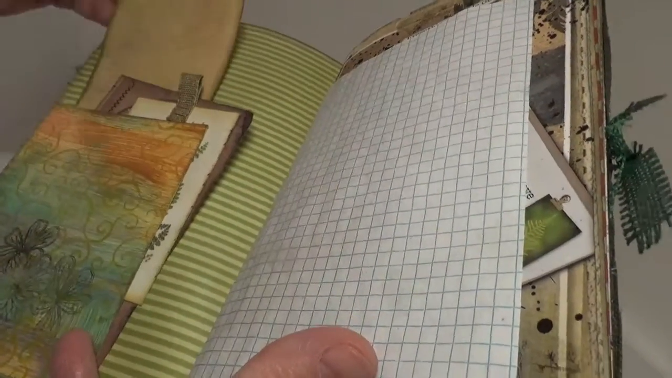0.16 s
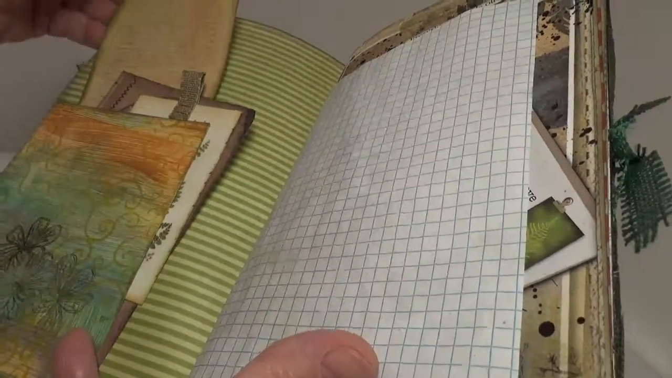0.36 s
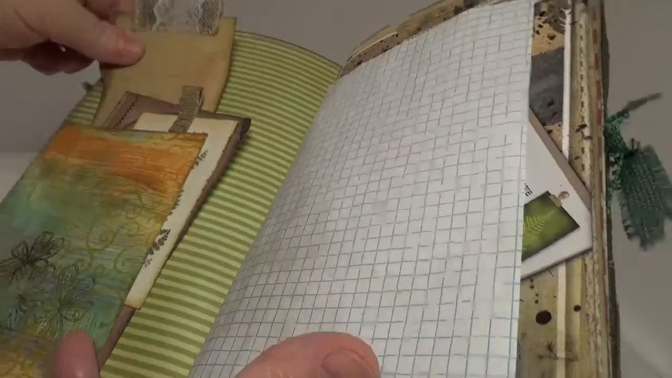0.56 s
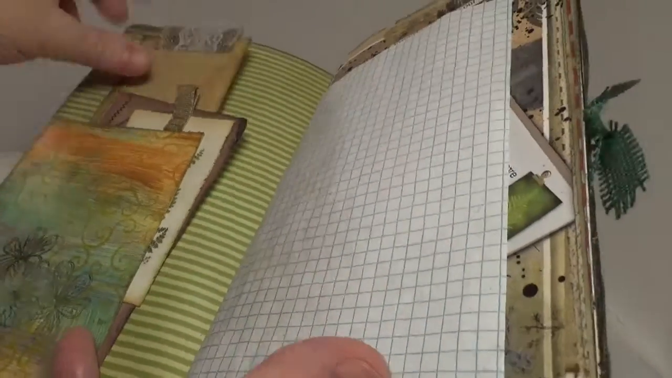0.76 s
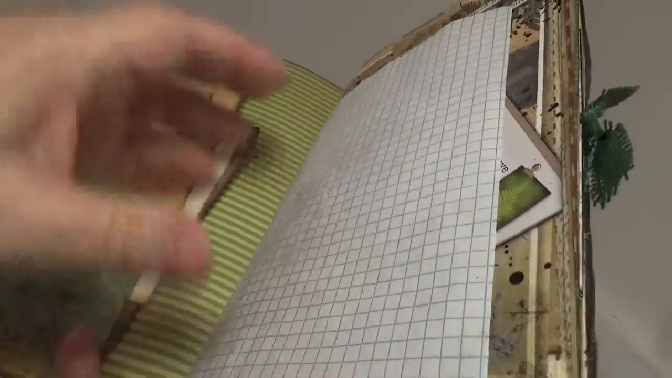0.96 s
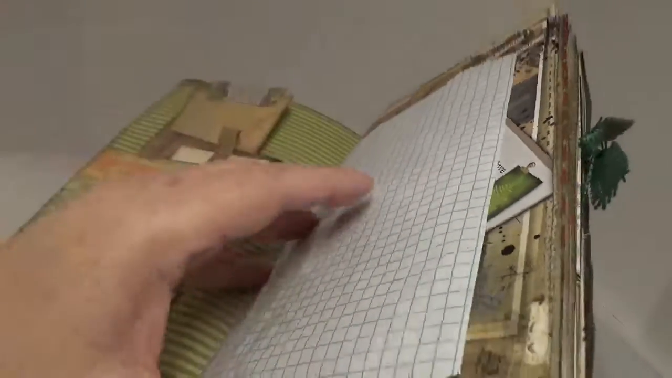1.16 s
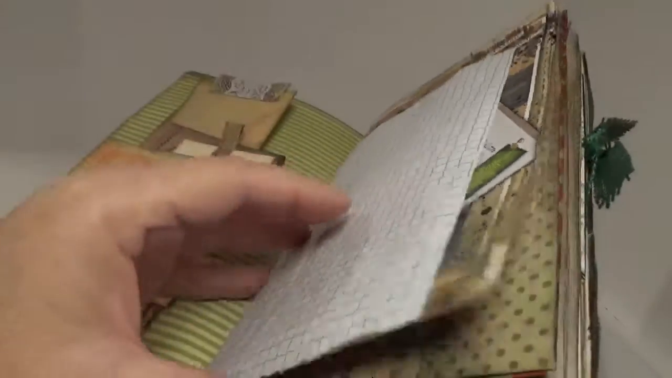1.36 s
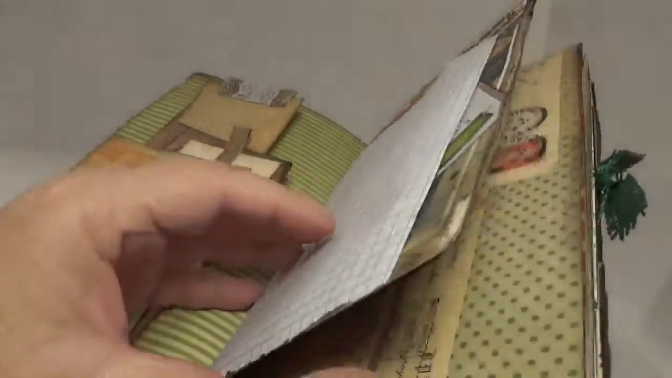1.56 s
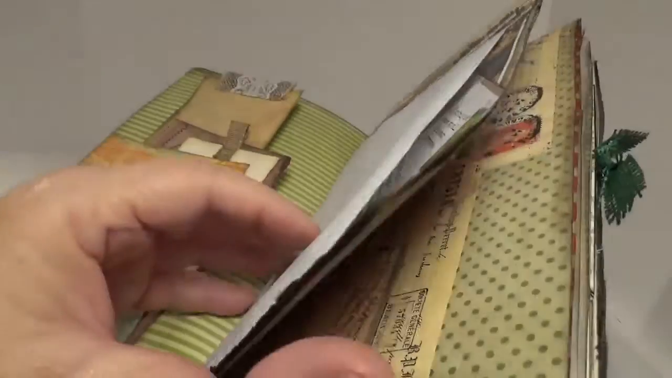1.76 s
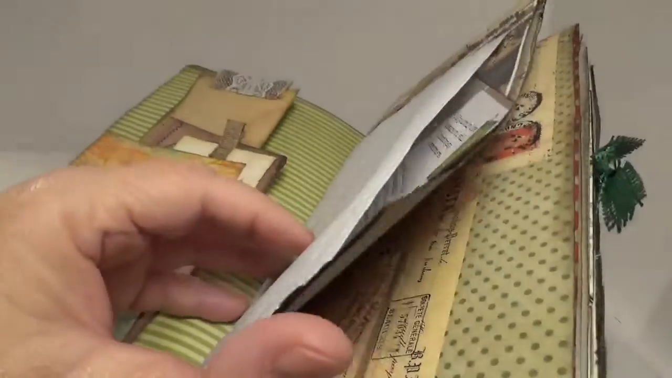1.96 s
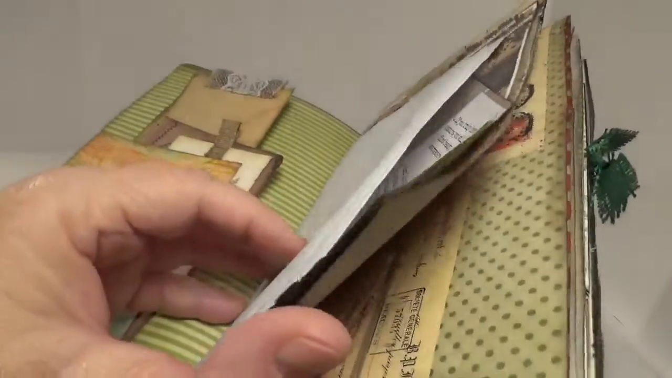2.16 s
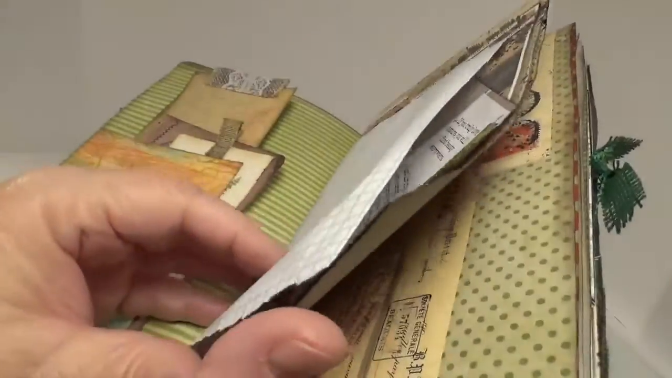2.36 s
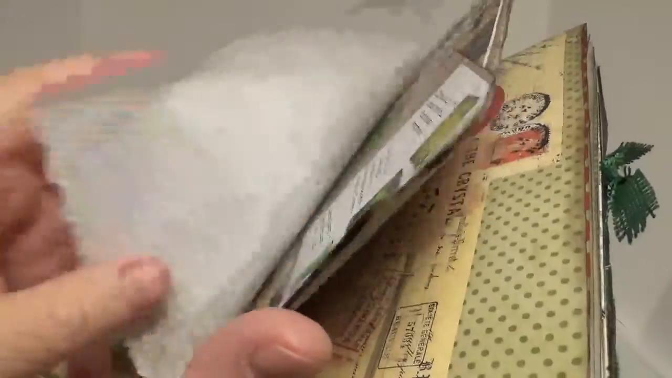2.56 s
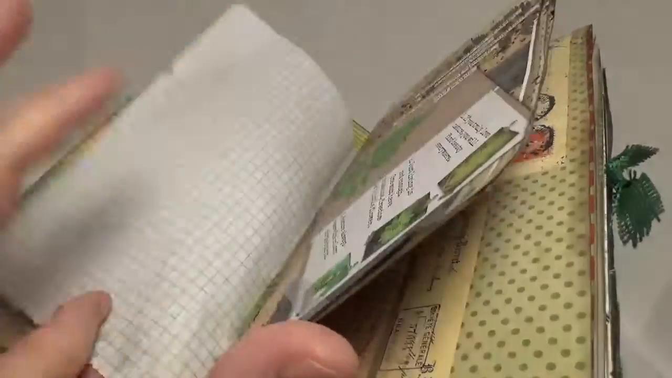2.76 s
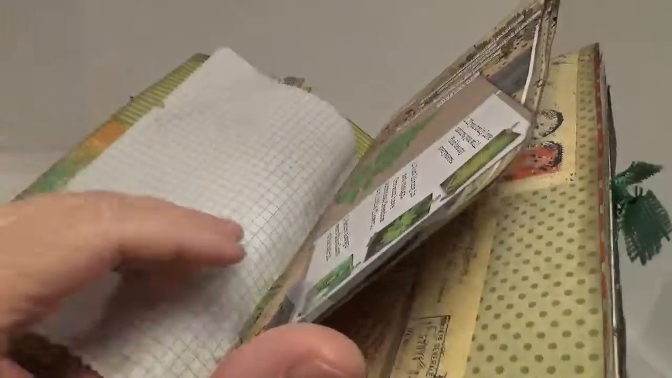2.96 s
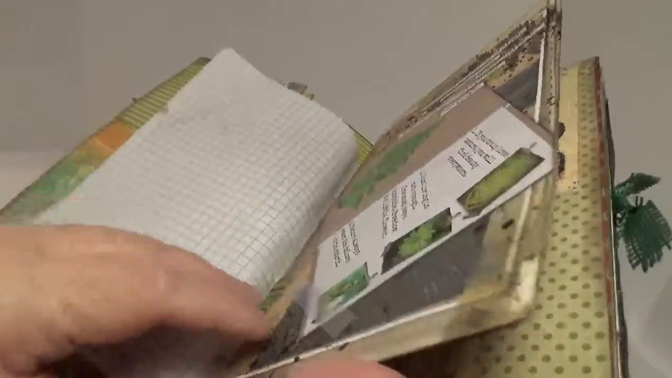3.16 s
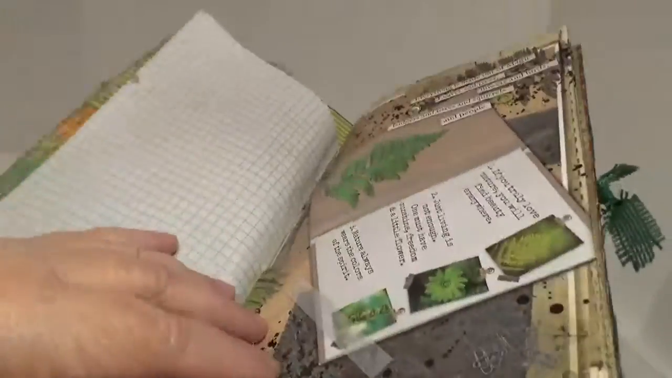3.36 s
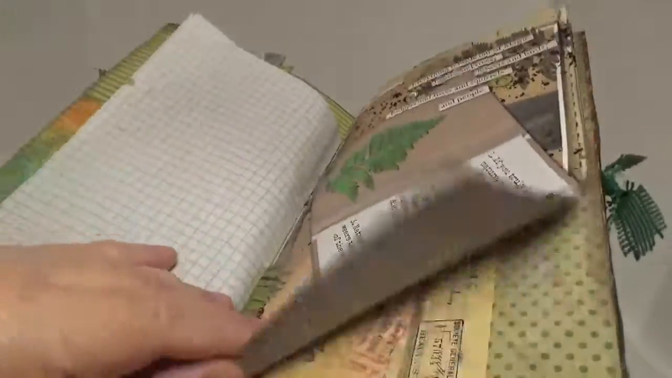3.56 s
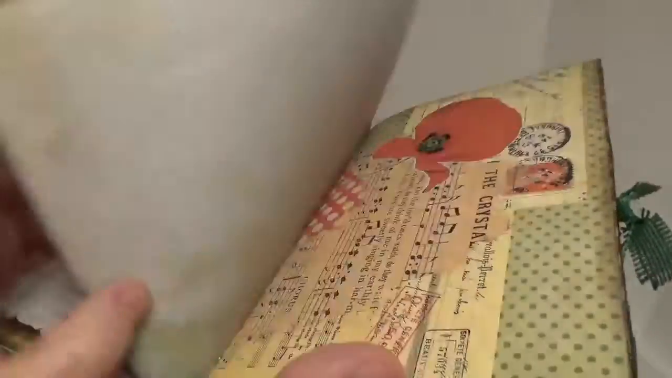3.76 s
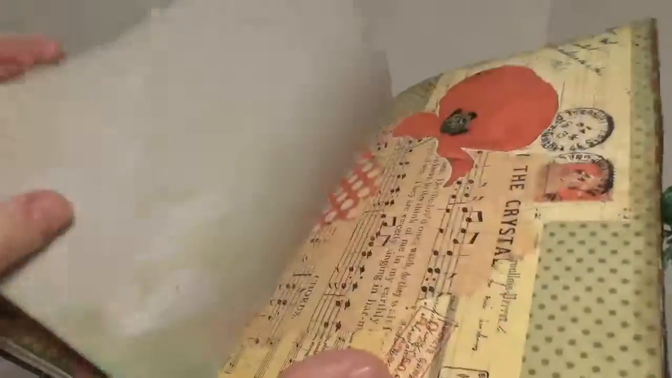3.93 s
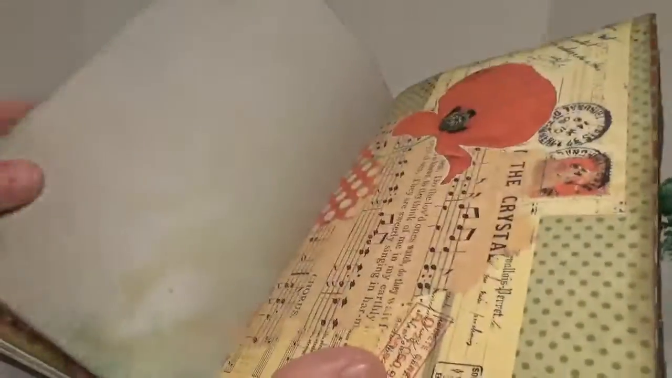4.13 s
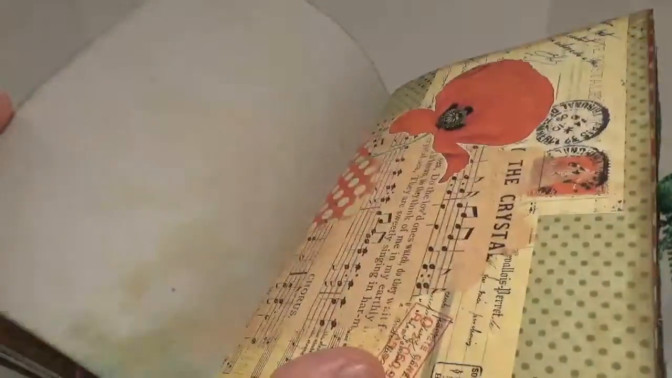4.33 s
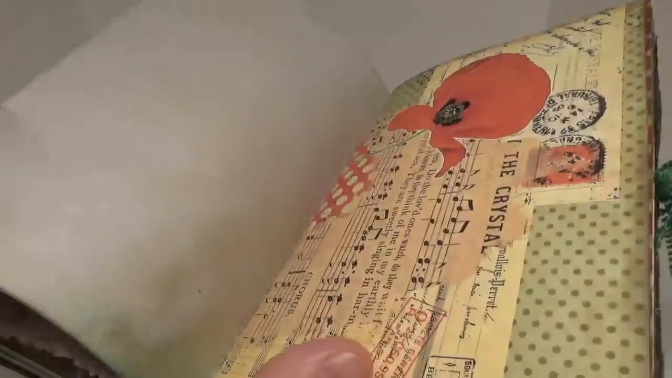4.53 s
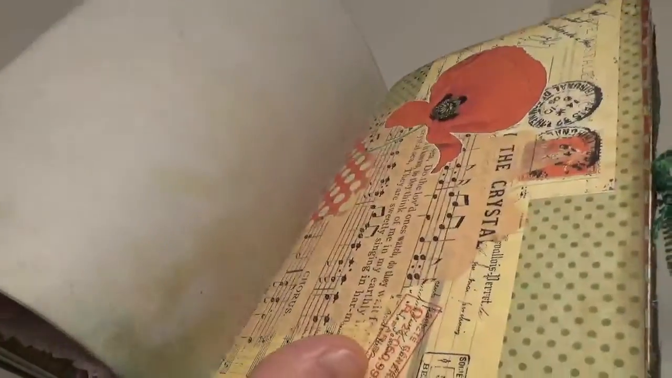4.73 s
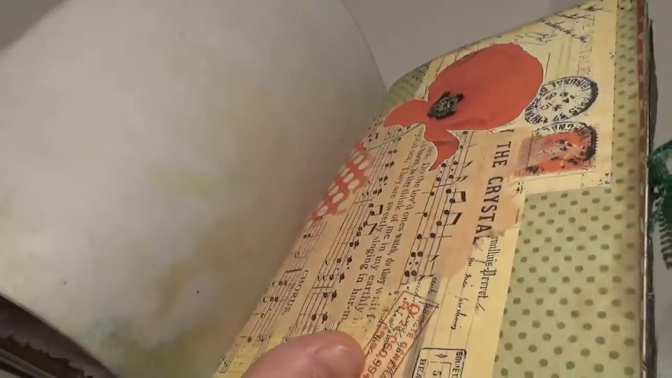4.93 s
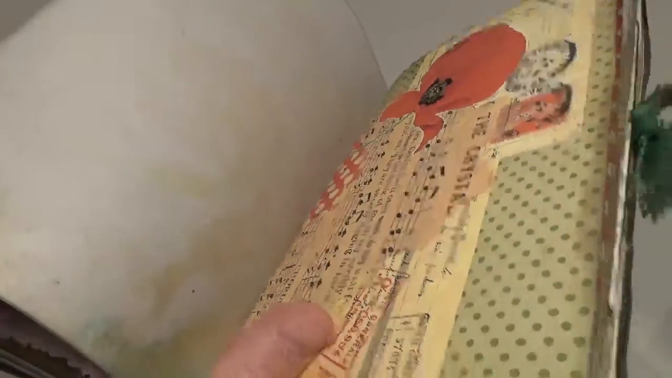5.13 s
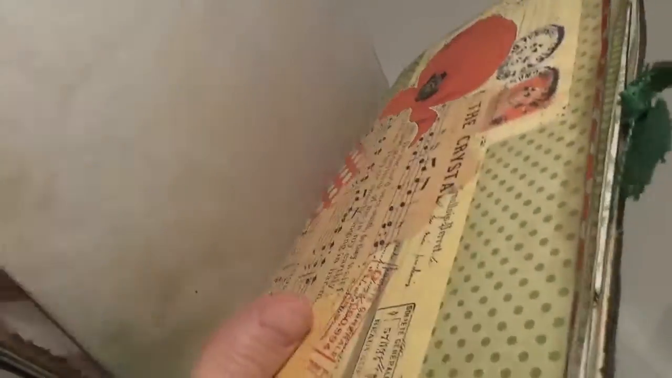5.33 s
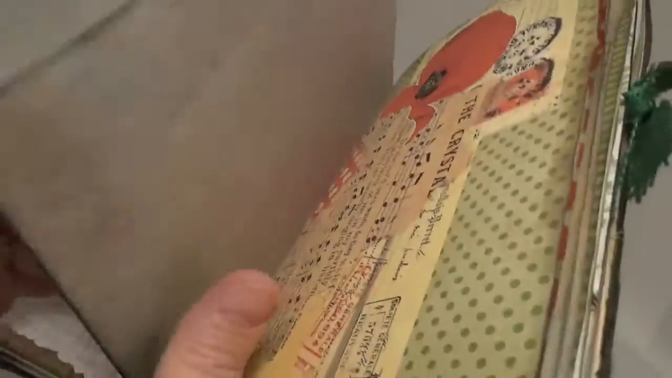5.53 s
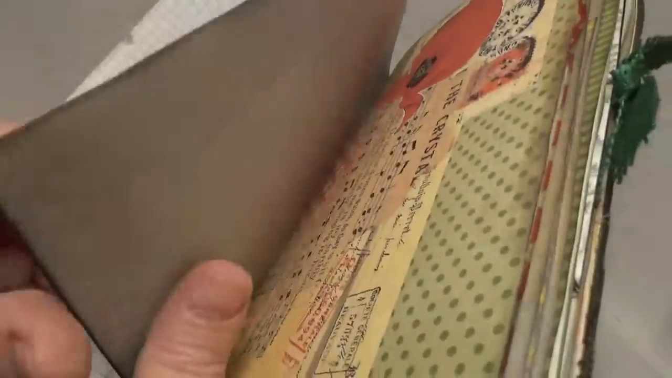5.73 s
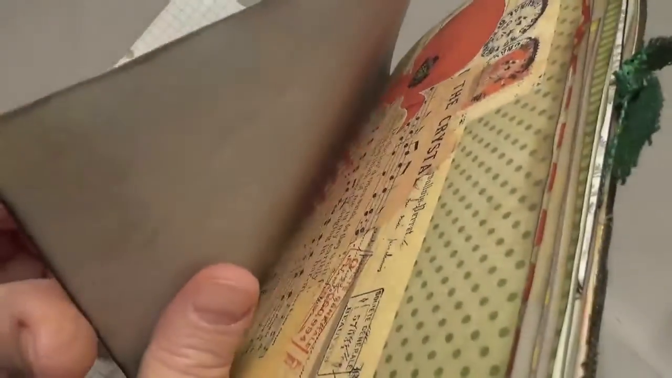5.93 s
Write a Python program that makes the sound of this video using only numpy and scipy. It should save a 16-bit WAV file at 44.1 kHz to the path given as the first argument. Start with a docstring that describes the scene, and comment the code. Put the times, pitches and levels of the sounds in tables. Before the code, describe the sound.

Close to the microphone, hands handle a thick album of paper and card. Light, dry sliding comes first, then a near lull, then a dense burst of sharp crackles and rustles as a sheet is flipped. More snapping strokes follow, with soft low puffs of air from swinging pages. After a quieter pause comes another brief crinkly turn, then faint brushing. The small, quiet room has a faint low hum.

```python
"""Sheets slide over one another as hands leaf through a thick album of paper pages and cards, close by.
Each stroke is friction noise in three bands, roughened by tiny catches and ringing crinkles. Creases
snap through as short coloured noise bursts; turned pages flap air as low, quickly dying sine puffs.
Behind them lie a short diffuse room, shaped air noise and the narrow noise bands of a far machine."""
import sys
import numpy as np
from scipy import signal
from scipy.fft import rfft, irfft, next_fast_len
from scipy.io import wavfile
from scipy.ndimage import uniform_filter1d, map_coordinates

SR = 44100
rng = np.random.default_rng(int(sys.argv[2]) if len(sys.argv) > 2 else 0)


def master(y):
    """Save y as 16-bit WAV."""
    cut = np.clip(np.atleast_2d(y).T, -1, 1)
    pcm = np.round(cut * 32767)  # scale
    wavfile.write(sys.argv[1], SR, pcm.astype(np.int16))


N = 268789


def amp(db):
    """Decibels to gain."""
    return 10 ** (np.asarray(db) / 20)


def unit(x):
    """Scaled to rms 1."""
    return x / np.sqrt(np.mean(x ** 2) + 1e-20)


def along(points, hz):
    """Value at hz between (Hz, value) points on a log frequency axis."""
    f, v = np.transpose(points)
    return np.interp(np.log(hz + 1), np.log(f + 1), v)


def wobble(rate):
    """A smooth random curve with rate knots a second."""
    knots = rng.standard_normal(int(N * rate / SR) + 4)
    return map_coordinates(knots, [np.arange(N) * rate / SR])


def filtered(x, response):
    """x shaped by a response that is a function of frequency in Hz."""
    m = next_fast_len(x.shape[-1] + 8192)
    spectrum = rfft(x, m) * response(np.fft.rfftfreq(m, 1 / SR))
    return irfft(spectrum, m)[..., :x.shape[-1]]


def resonance(f, hz, width_hz):
    """Response of one causal resonance, with gain 1 at its centre."""
    return 1j * f * width_hz / (hz * hz - f * f + 1j * f * width_hz)


def room_tone():
    """Air noise, most alike at both microphones in the bass, and a wavering hum of narrow noise bands."""
    # Colour of the air. Each row: frequency in Hz, relative level in dB.
    air_colour = [(25, -22), (55, -16.5), (125, -13.5), (270, -24), (1200, -30), (5000, -34.5),
                  (11000, -42.5)]
    # Bands of the far machine. Each row: centre in Hz, width of each of two passes in Hz, rms level in dB.
    hum_bands = [(61.5, 0.27, -56), (70.8, 23, -56), (112.3, 17, -58.5), (176.8, 8.7, -60.5),
                 (239.3, 8, -61.5)]
    air_db = -52.5
    likeness = [(200, 0.97), (600, 0.23), (3000, 0.35), (6000, 0.75)]  # (Hz, correlation left to right)

    def mid_and_side(hz):
        turn = np.arccos(np.clip(along(likeness, hz), 0, 1)) / 2
        return amp(along(air_colour, hz)) * [np.cos(turn), np.sin(turn)]

    mid, side = filtered(rng.standard_normal((2, N)), mid_and_side)
    air = amp(air_db) * unit(np.array([mid + side, mid - side]))
    hum = np.zeros(N)
    for hz, width_hz, db in hum_bands:
        band = filtered(rng.standard_normal(N), lambda f: resonance(f, hz, width_hz) ** 2)
        hum += amp(db) * unit(band)
    return air + hum


def room(x):
    """Diffuse answer of the room: decaying noise, different at each microphone."""
    # How long the room rings. Each row: frequency in Hz, time to die by 60 dB in seconds.
    decay_times = [(300, 0.013), (2000, 0.067), (10000, 0.0028)]
    hz, t, z = signal.stft(rng.standard_normal((2, SR // 3)), SR, nperseg=256)
    decay = amp(-60 * t / along(decay_times, hz)[:, None])
    tail = signal.istft(z * decay, SR, nperseg=256)[1]
    tail = tail / np.linalg.norm(tail, axis=1, keepdims=True)
    return signal.fftconvolve(x[None], tail, axes=1)[:, :N]


def flaps():
    """A page swings and pushes a soft low puff of air: one lump that rings briefly."""
    # Pages pushing air. Each row: start in seconds, peak of the envelope in dB, centre in Hz.
    puffs = [(1.369, -40, 345), (2.615, -25.5, 193), (4.045, -28.5, 140), (4.147, -30.5, 288),
             (5.314, -23.5, 181)]
    out, t = np.zeros(N + SR), np.arange(8192) / SR
    for start_s, db, hz in puffs:
        turns = hz * t
        envelope = 3 * turns * np.exp(1 - 3 * turns)
        push = envelope * np.sin(2 * np.pi * turns)
        out[round(start_s * SR):][:len(t)] += amp(db) * push
    return out[:N]


def snaps():
    """Each crease lets go in a short burst, coloured by the patch of sheet that it shakes, then flutters out."""
    # Creases snapping through. Each row: time in seconds, level in dB, centre in Hz, length in ms.
    creases = [(0.565, -23, 1600, 1.9), (0.776, -18, 2020, 5.1), (1.434, -26.5, 3840, 1.7),
               (1.886, -28.5, 8570, 1.6), (2.017, -37.5, 2350, 6.6), (2.09, -32.5, 7100, 2),
               (2.21, -34, 5200, 4.1), (2.242, -26, 5350, 2.6), (2.361, -15.5, 2580, 2.04),
               (2.379, -23, 1760, 1.9), (2.419, -6, 5330, 0.67), (2.475, -27.5, 2690, 2),
               (2.577, -18.5, 7730, 2.1), (2.607, -19, 3070, 4.5), (2.617, -6.5, 2080, 1.1),
               (2.624, -11.5, 3750, 2.2), (2.643, -19.5, 3460, 2.4), (2.655, -15.5, 1900, 2.6),
               (2.669, -20, 7700, 2.4), (2.678, -22, 6040, 4), (2.686, -19, 2250, 2.7),
               (2.705, -19.5, 2500, 2), (2.708, -16.5, 1820, 2.9), (2.759, -15, 2510, 5.8),
               (2.772, -26, 3000, 3.7), (2.792, -21, 2470, 4.3), (2.811, -21, 5500, 2.5),
               (2.821, -25.5, 1970, 18), (2.834, -23.5, 2760, 14), (2.857, -8, 4000, .9),
               (2.858, -18, 2750, 7.2), (2.935, -28.5, 3200, 12), (3.06, -15, 2760, 3.6),
               (3.065, -18, 3000, 2.4), (3.071, -16, 3180, 6.1), (3.075, -20, 3270, 6.1),
               (3.097, -14, 3180, 2.2), (3.113, -27.5, 4080, 7.1), (3.192, -31, 2370, 6),
               (3.339, -15.5, 2930, 2.4), (3.42, -29.5, 8300, 5.6), (3.573, -20, 1350, 5.9),
               (3.587, -13.5, 4000, 2.2), (3.591, -9, 6260, 1.7), (3.711, -9.5, 5060, 1.4),
               (3.721, -21, 1980, 9.9), (3.762, -11.5, 4200, 1.84), (3.794, -22.5, 2980, 7),
               (3.819, -23, 1440, 10.3), (3.959, -23, 1170, 12), (4.003, -8.5, 3770, 1.3),
               (4.006, -13, 4170, 1.4), (4.009, -20.5, 3250, 7.1), (4.034, -17, 3500, 3.9),
               (4.05, -21, 2680, 4.1), (4.12, -27.5, 3930, 10), (4.203, -29, 2760, 5.4),
               (4.329, -30.5, 1040, 12), (4.499, -27, 980, 4.1), (4.509, -22.5, 2780, 5.1),
               (4.742, -47, 2440, 14), (5.211, -28, 1620, 4), (5.245, -28.5, 1700, 5.6),
               (5.27, -15.5, 3800, 6), (5.282, -18, 3300, 6.3), (5.314, -18.5, 2620, 6),
               (5.324, -22, 696, 3.5), (5.375, -26, 1410, 14), (5.395, -16.5, 3100, 3.9),
               (5.5618, -35.5, 2980, 1.3), (5.661, -28.5, 1180, 4.9), (5.671, -18, 3050, 2.1)]
    rise_s, lead_s = 0.00075, .0007  # the burst starts a little ahead of its listed time
    crack_db, crack_s = 0, 0.0022  # broad crack at the start; time constant of its dying away
    thud_hz, thud_db = 505, -6.5  # the whole stack of pages answers every snap
    out, t = np.zeros(N + SR), np.arange(2048) / SR
    noise = rng.standard_normal((len(creases), len(t)))
    flutter = amp(-12 - 60 * t / 0.02)  # quieter tail, 60 dB down in 20 ms
    for (time_s, db, hz, ms), n in zip(creases, noise):
        u = t * 1000 / ms
        burst = (1 - np.exp(-(t / rise_s) ** 2)) * (np.exp(-u ** 2.13) + flutter)
        crack_hz = np.sqrt(hz * 2500)  # midway in pitch between the patch and 2500 Hz

        def patch_and_thud(f):
            patch = resonance(f, hz, 0.96 * hz) ** 2
            return patch - amp(thud_db) * resonance(f, thud_hz, thud_hz) ** 2

        def broad(f):
            return amp(crack_db) * resonance(f, crack_hz, 2.35 * crack_hz) ** 3

        snap = filtered(n * burst, patch_and_thud)
        snap = snap + filtered(n * burst * np.exp(-t / crack_s), broad)
        # Match the energy to the burst's own, so that colour does not change the level.
        snap = snap / np.sqrt(np.sum(snap ** 2) / np.sum(burst ** 2))
        out[round((time_s - lead_s) * SR):][:len(t)] += amp(db) * snap
    return out[:N]


def catches(per_s):
    """Tiny catches of unequal size, each dying in a few milliseconds."""
    happens = rng.random(N) < per_s / SR
    ticks = happens * amp(4 * np.minimum(rng.exponential(size=N), 1.6))
    decay = amp(-60 * np.arange(SR // 50) / SR / .009)  # 60 dB in 9 ms
    return unit(np.convolve(ticks, decay)[:N])


def crinkles():
    """Tiny creases at random moments, each with its own pitch and size, ringing a few cycles."""
    per_s, centre_hz, ring_cycles = 110, 3660, 2.2  # cycles to fall to 1/e
    when, pitch, size = rng.random((int(per_s * N / SR), 3)).T
    hz = centre_hz * 2 ** (2 * pitch - 1)  # up to an octave either way
    k = np.arange(512)
    turns = np.outer(hz, k) / SR
    gain = amp(-5 * np.log(size + .03))[:, None]  # few large, many small
    rings = gain * np.exp(-turns / ring_cycles) * np.sin(2 * np.pi * turns)
    places = (when * N).astype(int)[:, None] + k
    return unit(np.bincount(places.ravel(), rings.ravel(), minlength=N)[:N])


def strokes():
    """Levels of rub, bending card and fingertip hiss: a brighter stroke has more hiss and less bending."""
    # Strokes of one sheet over another. Each row: start in seconds, length in seconds, level in dB,
    # swell from start to end in dB, brightness (hiss gained against bending) in dB.
    sheet_strokes = [(-.01, 0.076, -34.5, -7, 13.5), (0.041, .2, -37, -0.5, 11.5),
                     (0.244, 0.066, -46.5, 7, 4), (0.334, 0.23, -35.5, 14, 14.5),
                     (0.568, 0.12, -39.5, 6.5, 9), (0.716, 0.062, -38.5, 18, 13),
                     (0.781, 0.21, -51, -20, 31.5), (0.963, 0.15, -51, 6, 36.5),
                     (1.104, 0.066, -45, 4, 25.5), (1.202, 0.16, -53.5, 10, 24.5),
                     (1.358, 0.12, -45, -6, 24), (1.508, 0.017, -43.5, -6, 26), (1.523, 1, -64, -10, 26),
                     (1.853, 0.092, -53, 29, 30), (2.049, 0.072, -56, -26, 25),
                     (2.178, 0.031, -44.5, 18, 17), (2.225, 0.039, -41.5, 3, 23),
                     (2.297, 0.087, -41, -4, 24), (2.392, 0.18, -47.5, 2, 16),
                     (2.506, 0.13, -31.5, 10.5, 13.5), (2.644, 0.067, -36.5, 16, -9.5),
                     (2.723, 0.043, -37.5, 8, 18), (2.754, 0.075, -29.5, -3, -7),
                     (2.869, 0.026, -22.5, 6, 16), (2.912, 0.053, -45, -8, -15),
                     (2.989, 0.055, -39, -3, 0.5), (3.032, 0.12, -39.5, -16, -4), (3.13, 0.14, -39, 9, 11),
                     (3.274, 0.099, -38, 10.5, 17), (3.391, 0.11, -45, -2.5, 2), (3.518, 0.12, -32, 15, 9),
                     (3.657, 0.22, -33, 7.5, 9), (3.838, 0.059, -37, 1, 37), (3.845, 0.16, -33, 6, 3),
                     (3.994, 0.1, -29, -17, 4), (4.093, 0.26, -35.5, -11.5, 6.5),
                     (4.325, 0.17, -42.5, 3.5, -4), (4.492, 0.11, -47, -30, -1), (4.59, 0.057, -50, 8, -7),
                     (4.776, 0.039, -45.5, 15, -4.5), (4.842, 0.063, -48.5, 26.5, 0.5),
                     (5.164, 0.039, -41.5, 1, 0), (5.231, 0.009, -33, -4, -3),
                     (5.262, 0.085, -31, -16, 3.5), (5.339, 0.017, -26, 5, 11),
                     (5.357, 0.052, -35, -6, -9.5), (5.402, 0.082, -44, -6, -1.5),
                     (5.567, 0.11, -50.5, -7, 17.5), (5.649, 0.22, -50, -22, -3),
                     (5.795, 0.079, -47.5, 6, 17), (5.885, 0.1, -48, 5, 2)]
    roundness, dying_s = 0.33, 0.0083  # power of the half-sine shape; time constant of the power
    bend_db, hiss_db = -1.5, -6.5  # over the rub for a stroke of brightness 0
    bend_share = 0.56  # part of the brightness taken from the bending
    step = 32  # samples between computed levels
    t = np.arange(N // step + 1) * step / SR
    power = np.full((3, len(t)), 1e-12)
    for start_s, length_s, db, swell_db, bright_db in sheet_strokes:
        u = np.clip((t - start_s) / length_s, 0, 1)
        shape = np.abs(np.sin(np.pi * u)) ** roundness * amp(db + swell_db * (u - .5))
        mix_db = [0, bend_db - bend_share * bright_db, hiss_db + (1 - bend_share) * bright_db]
        power += np.outer(amp(mix_db), shape) ** 2
    keep = np.exp(-step / (dying_s * SR))
    smooth = signal.lfilter([1 - keep], [1, -keep], power)
    levels_db = 10 * np.log10(smooth + 1e-12)
    return [np.interp(np.arange(N) / SR, t, db) for db in levels_db]


def fibres(spectrum, grip, wide_db):
    """Friction noise under a changing grip, in drifting patches of colour, from an area of some width."""
    patchy_db = 1.7  # rms drift of the colour as other parts of the sheets touch
    z = signal.stft(rng.standard_normal((2, N)), nperseg=512)[2]
    field = rng.standard_normal(z.shape[1:])
    field = uniform_filter1d(field, size=14, axis=0)  # across frequency
    field = uniform_filter1d(field, size=8, axis=1)  # across time
    noise = signal.istft(z * amp(patchy_db * unit(field)), nperseg=512)[1][:, :N]
    mid, side = filtered(grip * noise, lambda hz: amp(along(spectrum, hz)))
    return unit(np.array([mid + amp(wide_db) * side, mid - amp(wide_db) * side]))


def slide():
    """The stroke stutters; the more the card bends, the more it crackles instead of gliding."""
    # Colours of rubbing sheets, bending card and hiss. Each row: frequency in Hz, relative dB per Hz.
    rub_colour = [(700, -18.5), (1800, -3), (3400, 2.5), (5500, -0.5), (9000, -27.5)]
    bend_colour = [(60, -37), (140, -11.5), (380, -8), (760, -8), (1400, -4.5), (3500, -22)]
    hiss_colour = [(3500, -22), (6000, -8.5), (8500, -4), (11000, -13)]
    crinkle_db = 3  # over the rub, before the crackle share
    rub_db, bend_db, hiss_db = strokes()
    crackle = np.clip(0.011 + 0.31 / (1 + amp(3.3 * (hiss_db - bend_db))), 0, .8)  # share from 0 to 1
    stutter_db = (1 + 2 * crackle) * (.9 * wobble(40) + .9 * wobble(110))
    own_db = [.9 * wobble(30) for _ in range(3)]  # each layer also wavers by itself
    # Share the power between steady gliding and catches.
    crinkle = np.sqrt(1 - crackle + crackle * catches(130) ** 2)
    graze = np.sqrt(1 - crackle / 2 + crackle / 2 * catches(140) ** 2)
    rub = amp(rub_db + stutter_db + own_db[0]) * fibres(rub_colour, crinkle, wide_db=-26)
    bend = amp(bend_db + stutter_db + own_db[1]) * fibres(bend_colour, crinkle, wide_db=-24)
    hiss = amp(hiss_db + stutter_db + own_db[2]) * fibres(hiss_colour, graze, wide_db=-11.0)
    return rub + bend + hiss + amp(rub_db + crinkle_db) * crackle * crinkles()


def scene():
    """The pages lie a little to the left; their treble leans further."""
    # Stereo lean of the paper. Each row: frequency in Hz, dB gained at left and lost at right.
    paper_lean = [(200, .1), (1000, .7), (4000, 1)]
    gap_hz, gap_width_hz, gap_db = 948, 73, -1  # a narrow ring, perhaps the air between the open pages
    room_db = -12.0

    def gap(hz):
        return 1 + amp(gap_db) * resonance(hz, gap_hz, gap_width_hz)

    def lean(hz):
        return amp(along(paper_lean, hz) * np.array([[1], [-1]]))

    paper = filtered(slide() + snaps(), gap)
    reflections = amp(room_db) * room(paper.mean(axis=0))
    return filtered(paper, lean) + reflections + flaps() + room_tone()


def record(dry):
    """Rounds off the tallest peaks and keeps only the sound below about 11 kHz."""
    ceiling, top_hz = .75, 11020  # full scale is 1
    rounded = dry / (1 + np.abs(dry / ceiling) ** 4) ** (1 / 4)
    return filtered(rounded, lambda hz: hz < top_hz)


dry = scene()
out = record(dry)
master(out)
```